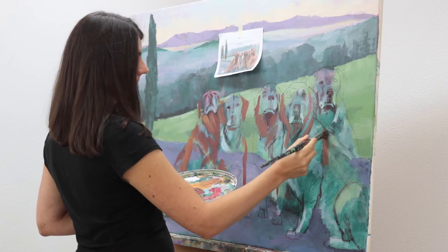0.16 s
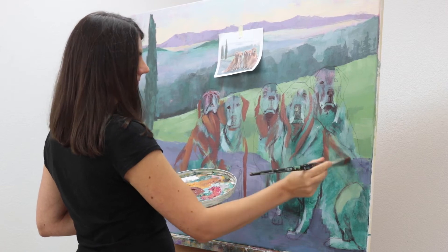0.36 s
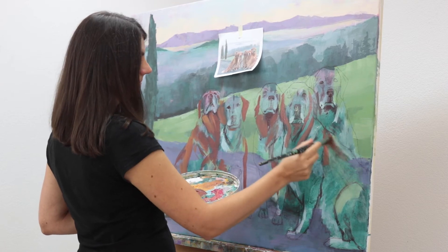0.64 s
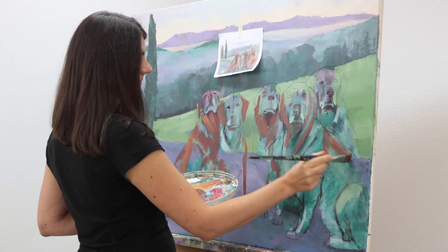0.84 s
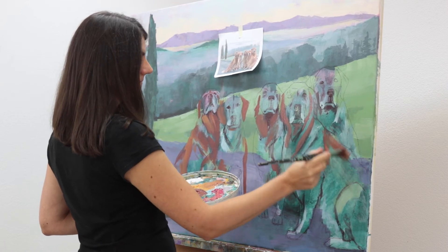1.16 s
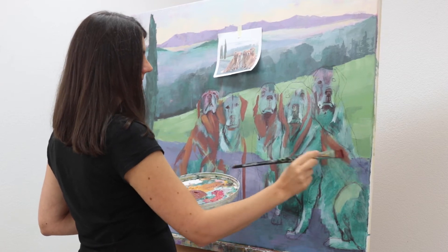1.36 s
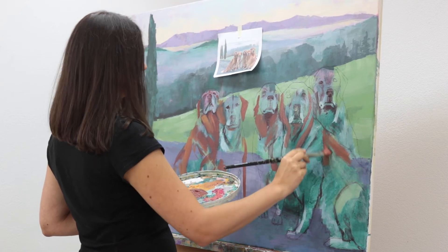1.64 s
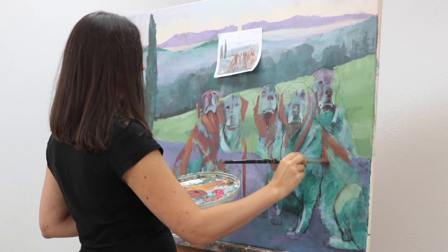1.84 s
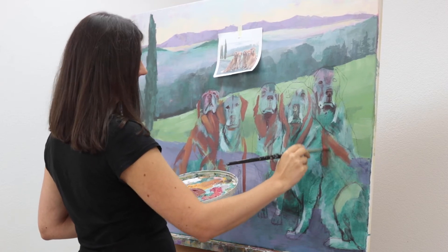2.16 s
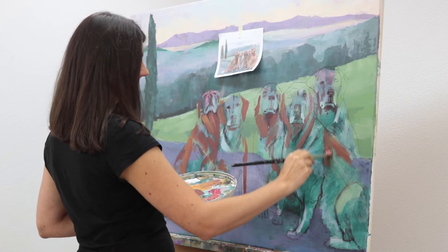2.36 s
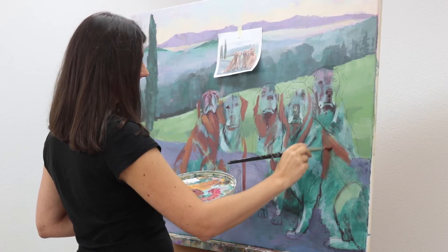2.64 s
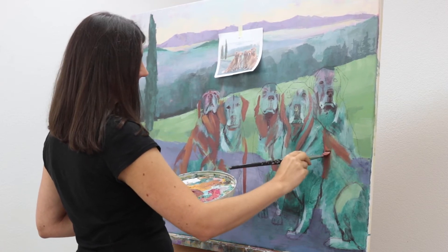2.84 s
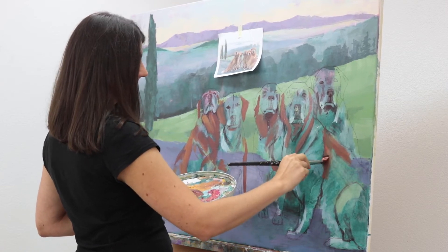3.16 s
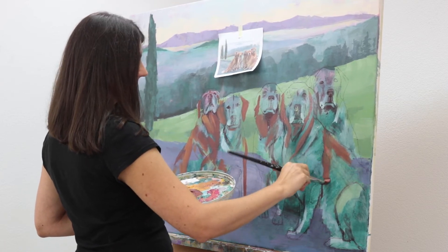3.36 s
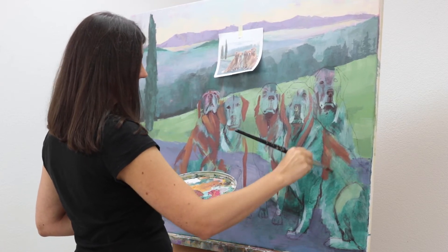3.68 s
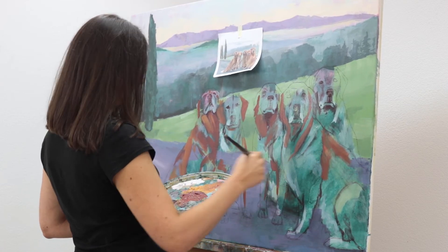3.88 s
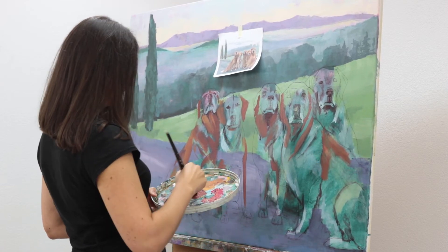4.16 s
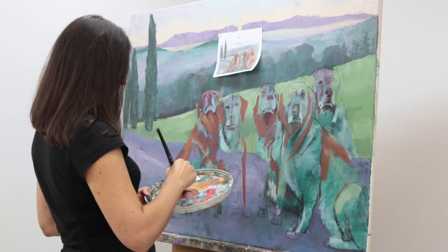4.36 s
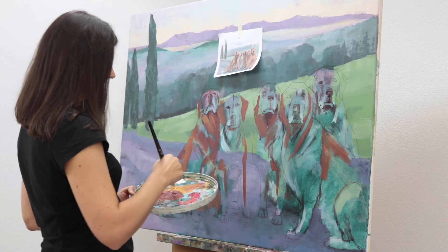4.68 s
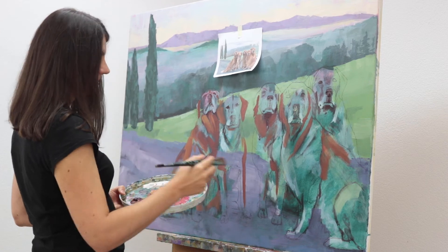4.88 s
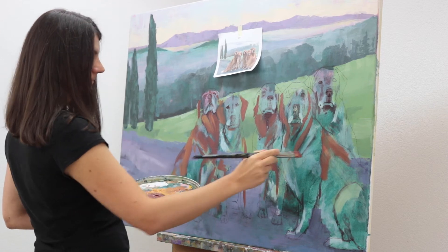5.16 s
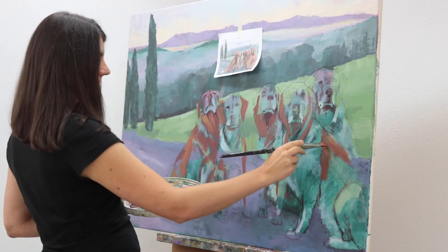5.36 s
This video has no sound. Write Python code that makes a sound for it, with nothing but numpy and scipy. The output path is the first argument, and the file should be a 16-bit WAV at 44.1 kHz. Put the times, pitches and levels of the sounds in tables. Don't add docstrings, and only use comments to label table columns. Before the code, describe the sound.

Short hissing bristle strokes with faint squeaks and hollow membrane thuds fill the first few seconds. The strokes stop, cloth rustles, and the brush raps a hand-held plate in two or three small clusters, with brief ringing, wet drags and tiny snaps. A quieter pause follows, then dull wooden ticks and soft final strokes. Quiet room, short reflections, gentle low rumble, microphone a few steps away.

```python
import sys
import numpy as np
from scipy import signal
from scipy.fft import rfft, irfft
from scipy.io import wavfile
from scipy.ndimage import uniform_filter1d

SR = 44100
rng = np.random.default_rng(int(sys.argv[2]) if len(sys.argv) > 2 else 0)


def pcm_store(signal):
    levels = np.round(np.clip(np.atleast_2d(signal), -1, 1) * 32767)
    wavfile.write(sys.argv[1], SR, levels.astype(np.int16).T)


def field_ratio(decibels):
    return 10 ** (np.asarray(decibels, dtype=float) / 20)


N = 243431

# start_s, length_s, level_db, share of length before the top
STROKES = [(0.0, 0.091, -61, 0.67), (0.113, 0.17, -51, 0.12), (0.218, 0.25, -49, 0.65),
           (.455, 0.05, -54.5, 0.23), (.544, 0.027, -54, 0.12), (0.591, 0.28, -51.5, 0.55),
           (.868, 0.06, -53.5, 0.75), (.893, 0.17, -48.5, 0.3), (1.044, 0.34, -50, 0.34),
           (1.292, 0.21, -51.5, 0.77), (1.502, 0.12, -52.5, 0.69), (1.634, 0.16, -52, 0.47),
           (1.795, 0.12, -56.5, 0.6), (1.965, 0.19, -59, 0.47), (2.13, 0.16, -51.5, 0.74),
           (2.28, 0.13, -51, 0.72), (2.36, 0.18, -51, 0.39), (2.521, 0.2, -51.5, 0.71),
           (2.722, 0.19, -59.5, 0.21), (2.912, 0.27, -64, 0.32), (3.13, 0.16, -62, 0.95),
           (3.25, 0.17, -51.5, 0.66), (3.41, 0.081, -63.5, 0.76), (3.463, .14, -50.5, 0.4),
           (3.62, 0.11, -48.5, .4), (5.096, 0.41, -59, 0.46), (5.4, 0.036, -54.5, .25),
           (5.438, 0.12, -55.5, .5)]
# freq_hz, density_db (per Hz)
BRISTLE_HISS = [(530, -3), (900, 5.5), (1390, -4), (1720, -2.5), (2330, 2.5), (3340, -3), (4860, -3.5),
                (5550, -6.5), (6250, -3.5), (7060, -7), (10800, -9), (15400, -16.5)]
# ring_hz, width_hz, level_db
BRISTLE_RINGS = [(1660, 38, 11.5), (5090, 150, 5.5), (6500, 500, -6)]
# time_s, bent_ring_hz, bent_ring_db, brightness_db (above 6 kHz)
GRIP = [(0.05, 4600, -4, 4), (.15, 4430, -4, -6), (.37, 4580, -25, 4.5), (.55, 4300, -6, -2),
        (.8, 4900, -10, 2), (1.0, 4700, -14, 3), (1.2, 4500, -25, 2), (1.55, 4200, -3, 1.5),
        (2.0, 3980, 9.5, 4), (2.2, 4380, -9, -1), (2.45, 4150, -2, 2), (2.62, 4200, -3, 1.5),
        (3.0, 4400, -11, 3), (3.36, 4150, -12, 0.5), (3.53, 4500, 8, 6), (3.67, 4370, -2, 0.5),
        (5.25, 4200, -34, -11), (5.5, 4400, -4, -17)]
# start_s, length_s, level_db, pitch_hz
SQUEALS = [
    (0.0, .078, -66, 6500),
    (0.127, 0.036, -64, 4280),
    (.55, .015, -71, 6700),
    (.9025, 0.0084, -46.5, 2400),
    (.91, 0.044, -64, 4700),
    (1.53, 0.09, -60, 4120),
    (1.665, 0.076, -66, 4100),
    (1.8, .09, -65, 5300),
]
# start_s, length_s, drum_db, share before the top, upper_over_low_db
PRESSES = [(0.127, 0.059, -51, 0.3, 13), (.175, .055, -52.5, .5, -1), (0.254, 0.16, -44.5, .2, -1),
           (0.456, 0.021, -51, 0.61, 3), (0.551, 0.02, -51, 0.22, -2), (0.627, 0.13, -51, 0.66, -3.5),
           (0.703, .15, -48.5, 0.24, -0.5), (0.905, 0.17, -55, 0.28, 1.5), (1, 0.056, -49, 0.81, 5.5),
           (1.054, 0.095, -57, 0.54, 0), (1.115, 0.1, -48.5, 0.63, -4), (1.176, 0.14, -51, 0.21, 3.5),
           (1.323, 0.17, -55, 0.82, 3.5), (1.516, 0.11, -62, 0.38, 8), (1.66, 0.19, -51, 0.13, 1),
           (1.971, 0.13, -58, 0.1, 2), (2.129, 0.13, -57.5, 0.5, 6.5), (2.235, 0.068, -55, .4, -10.5),
           (2.303, 0.14, -49, 0.51, -4), (2.39, 0.17, -46, 0.32, -4), (2.584, 0.16, -54.5, 0.56, 1),
           (2.715, 0.16, -59, 0.45, 9), (2.833, 0.26, -58, 0.56, -6), (3.077, 0.12, -65, 0.28, -3),
           (3.178, 0.24, -47.5, 0.79, -2.5), (3.483, 0.11, -45, .25, -2), (3.62, 0.11, -56, 0.38, 1),
           (5.07, 0.49, -73, 0.54, -8), (5.392, 0.11, -56.5, 0.3, -4.5), (5.47, 0.058, -49.5, 0.33, -1.5)]
# mode_hz, width_hz, level_db
CANVAS_LOW = [(184, 17, -9.5), (246.4, 49.5, 2), (355, 370, -5.5)]
# mode_hz, width_hz, level_db
CANVAS_UPPER = [(403, 44, -12.5), (534, 72, 3.5), (701, 110, -6), (770, 23, -8), (1020, 110, -21.5)]
# time_s, pitch_factor
TENSION = [(.15, 0.99), (.3, 0.93), (.7, .98), (.77, 1.17), (.84, 0.91), (1.17, 0.96), (1.22, 1.2),
           (1.4, 0.86), (1.7, 0.95), (2.0, 1.0), (2.26, 0.83), (2.36, 0.86), (2.43, 1.11), (2.5, .95),
           (2.62, 0.7), (3.28, 1.13), (3.34, .87), (3.52, 0.97)]
# freq_hz, density_db (per Hz)
AIR = [(90, -0.5), (250, -9), (600, -12), (1200, -16.5), (2300, -19), (4000, -26), (9500, -31.5),
       (15400, -31.5)]
# (over the usual, below 1.5 kHz)
DRIFT = [(0.0, -6), (.11, -2.5), (.3, -1), (1.8, 0), (2.8, 0), (3.8, -1), (4.3, 1.5), (4.75, -3.5),
         (5.0, -3), (5.2, 2)]
# low_hz, high_hz
CIRCUIT_BAND = (12750, 14300)
# pitch_hz, level_db
WHINES = [(10454, -88), (13690, -87), (14060, -86)]
# start_s, length_s, level_db, share before the top
RUMBLE = [(.15, 0.041, -49, 0.27), (.37, 0.15, -50, 0.5), (.6, 0.53, -52, 0.44), (1.15, 0.18, -61, 0.43),
          (1.38, 0.2, -49, 0.54), (1.6, 0.17, -41, 0.56), (1.76, 0.14, -44.5, 0.39),
          (2.25, 0.13, -49, 0.31), (2.45, 0.17, -41, 0.87), (2.72, 0.34, -46.5, 0.61),
          (3.06, 0.16, -55, 0.2), (3.45, 0.36, -41.5, 0.25), (3.85, 0.19, -46.5, 0.62),
          (4.08, 0.11, -57, 0.38), (4.3, 0.17, -61, 0.69), (4.44, 0.087, -48, 0.37),
          (5.15, 0.24, -49.5, 0.84), (5.4, 0.25, -39, 0.5)]
# freq_hz, density_db (per Hz)
RUMBLE_SHAPE = [(12, -17), (25, 14.5), (38, 10.5), (60, 0), (100, -6.5), (200, -38)]
# time_s, peak_db, rocking_hz
NUDGES = [
    (.16, -39, 60),
    (.39, -42, 71),
    (1.21, -44, 150),
    (1.659, -48, 202),
    (2.5, -44, 100),
    (2.79, -43, 55),
    (4.29, -45, 70),
    (4.881, -42, 63.6),
]
# time_s, peak_db, contact_ms
TICKS = [
    (0.182, -38, 0.33),
    (0.5465, -37, 0.34),
    (0.548, -38, .2),
    (0.5516, -43, 0.41),
    (0.555, -53, 0.42),
    (5.247, -34.5, 1),
    (5.409, -34, 0.96),
    (5.4998, -34.5, 0.73),
]
# mode_hz, level_db, t60_s
WOOD = [(354, -8.5, 0.023), (585, 3, 0.0024), (980, -20, 0.015), (2400, -24, .01), (4500, -18, .006)]
# time_s, peak_db, contact_ms, sway_db (whole canvas), tick_db, pitch_factor (spot)
TAPS = [
    (0.2506, -13.5, 1.32, -14, -20.5, 1.02),
    (0.278, -28.5, 0.88, -27, -25, 0.9),
    (0.9028, -27.5, 1.2, 0.5, -17, 1.15),
    (1.667, -51, 2.6, 20.5, -30, 0.39),
    (2.5718, -33.5, 3.6, 8.5, -30, 0.87),
    (3.4842, -18, 3.7, 1.5, -19.5, 0.913),
    (3.519, -37, 1.8, -17, -25, 0.9),
    (3.542, -35, 2.6, 0, -30, 1.05),
    (3.643, -38.5, 9.8, 15, -30, 0.7),
]
# mode_hz, level_db, t60_s
TAP_RING = [(234.6, 9.5, 0.049), (179, 11.5, 0.0041), (521, 6, 0.023), (913, -2.5, 0.064), (1950, -40, .02)]
# freq_hz, density_db (per Hz)
TIP_TICK = [(900, -10), (2500, -6), (4000, -8), (6500, -6), (8500, -11), (11000, -11), (13000, -10),
            (16000, -14)]
# start_s, length_s, level_db, share before the top
RUSTLE = [
    (3.72, 0.22, -62.5, 0.44),
    (3.86, 0.2, -72, 0.5),
    (4.05, 0.11, -60.5, 0.47),
    (4.64, 0.37, -60.5, 0.67),
    (4.98, 0.19, -64, 0.61),
]
# start_s, length_s, level_db, share before the top
DABS = [
    (4.165, 0.024, -44, 0.77),
    (4.187, 0.016, -48, .4),
    (4.2, 0.059, -49, 0.32),
    (4.235, 0.083, -54.5, 0.21),
    (4.303, 0.036, -57.5, .4),
    (4.382, 0.042, -46.5, 0.53),
    (4.425, 0.06, -54.5, 0.62),
    (4.476, 0.025, -56, 0.78),
    (4.553, 0.037, -47.5, 0.15),
    (4.58, 0.079, -56.5, .5),
]
# freq_hz, density_db (per Hz)
PAINT = [(700, -11), (1400, 0.5), (1950, -1), (2930, -6), (3470, -9), (4800, -8.5), (10600, -8),
         (15400, -20)]
# mode_hz, width_hz, level_db
PLATE_HUM = [(242, 120, -17), (499, 23, -7), (630, 130, -11), (790, 71, -5.5)]
# time_s, peak_db, contact_ms, shove_db (hand), clink_db (ferrule)
KNOCKS = [(4.1662, -32, 1.54, -3, -16), (4.1725, -31, 1.76, -18, -6), (4.1768, -35, 1.4, -18, 3),
          (4.1812, -23, 1.64, -23, -10), (4.186, -30.5, 0.54, -22, -14), (4.276, -55, 1, -13, -21),
          (4.386, -38, 0.17, -4, 0.5), (4.389, -33.5, 2.04, -29, -23), (4.409, -46, 1.05, 10, 3),
          (4.4648, -43, 0.78, -17, -3), (4.5548, -33, 1.7, 3, -30), (4.5564, -15.5, 1.98, -25, -19)]
# mode_hz, level_db, t60_s
PLATE = [(518, 10.5, 0.043), (490, -20, 1.2), (478, -25, .6), (550, -1, 0.036), (630, -12, 0.27),
         (674, 3.5, 0.037), (763, 8, 0.073), (739, -13, 0.43), (810, -24, 0.046), (358, -8.5, 0.06),
         (194, -4.5, 0.078), (145, -3.5, 0.03), (100, 3, 0.051)]
# mode_hz, level_db, t60_s
CLINK = [(1300, -12, .03), (1900, -2, .035), (2100, -1, .035), (3600, 0, .035), (5150, -3, .028)]
# time_s, peak_db, burst_ms, film_hz
SNAPS = [(4.19, -40, 1.6, 9000), (4.2445, -38, 3.6, 10400), (4.2478, -31, 0.87, 10400),
         (4.2502, -31, 3.3, 10000), (4.2685, -36, 2.6, 8000), (4.276, -33.5, 2, 7500),
         (4.4102, -42, 1.2, 7840), (4.4395, -37, 1.2, 8500), (4.4647, -32, 2, 9200),
         (4.566, -30.5, 1.5, 6500), (4.577, -29.5, 0.6, 11000), (4.648, -35, 0.86, 7500),
         (5.472, -41, 1.5, 8940), (4.4895, -39, 1.5, 8700), (4.219, -37, 2.2, 8500),
         (4.227, -40, 1.5, 7500), (4.3145, -37.5, 3.4, 7450)]
# freq_hz, density_db (per Hz)
SNAP_SHAPE = [(1500, -12), (4000, -3), (7000, -2.5), (10500, -2.5), (13000, -5), (16000, 0.5)]
# freq_hz, t60_s
STUDIO = [(150, 0.76), (500, 0.62), (2000, 0.68), (8000, 0.29)]


def evened(x):
    return x / np.sqrt(np.mean(x ** 2) + 1e-20)


def noise():
    return rng.standard_normal(N)


def over_time(points):
    time_s, *columns = np.transpose(points)
    return [np.interp(np.arange(N) / SR, time_s, column) for column in columns]


def read(points, hz):
    f, value = np.transpose(points)
    return np.interp(np.log(hz + 1), np.log(f + 1), value)


def add(mix, s, sound):
    part = mix[round(s * SR):][:len(sound)]
    part += sound[:len(part)]


def coloured(x, points):
    gain = field_ratio(read(points, np.fft.rfftfreq(len(x), 1 / SR)))
    return evened(irfft(rfft(x) * gain, len(x)))


def patchy(x, patchy_db, frames, bins):
    z = signal.stft(x, nperseg=512)[2]
    patches = uniform_filter1d(rng.standard_normal(z.shape), int(bins), 0)
    patches = evened(uniform_filter1d(patches, int(frames), 1))
    return evened(signal.istft(z * field_ratio(patchy_db * patches), nperseg=512)[1][:N])


def resonate(x, hz, width):
    turn = np.exp(2j * np.pi * np.cumsum(hz * np.ones(len(x))) / SR)
    r = np.exp(-np.pi * width / SR)
    return 2 * (turn * signal.lfilter([1 - r], [1, -r], x / turn)).real


def arches(rows, sharp):
    power = np.zeros(N)
    for start, length, db, share in rows:
        top = np.clip(share, .03, .97) * length
        u = np.interp(np.arange(0, length, 1 / SR), [0, top, length], [0, 1, 0])
        add(power, max(start, 0), (field_ratio(db) * np.sin(np.pi / 2 * u) ** sharp) ** 2)
    return np.sqrt(power)


def slips(per_s, spread_db, flicker_db, flicker_ms):
    size = field_ratio(spread_db * np.minimum(rng.exponential(1, N), 5)) * rng.choice([-1., 1.], N)
    clumps = evened(uniform_filter1d(noise(), int(flicker_ms * SR / 1000)))
    happens = rng.random(N) < per_s / SR
    return evened(size * happens * field_ratio(flicker_db * clumps))


def drum(shake, modes, pitch=1):
    skin = np.zeros(N)
    for k, (hz, width, db) in enumerate(modes):
        skin += (-1) ** k * field_ratio(db) * evened(resonate(shake, pitch * hz, width))
    return evened(signal.sosfilt(signal.butter(2, 140, "high", fs=SR, output="sos"), skin))


def struck(modes, contact_ms, pitch=1):
    t = np.arange(SR // 2) / SR
    ring = sum(field_ratio(db - 60 * t / t60) * np.cos(2 * np.pi * pitch * hz * t) for hz, db, t60 in modes)
    u = t[:400] * 1000 / contact_ms
    push = np.sin(np.pi * np.minimum(u / 1.246, 1)) ** 4
    ring = signal.fftconvolve(ring, push)[:len(t)]
    return ring / abs(ring).max()


def sway(hz, t60, lead, rise_s):
    t = np.arange(SR // 2) / SR
    return -field_ratio(-60 * t / t60) * np.sin(2 * np.pi * hz * t + lead) * np.minimum(t / rise_s, 1)


def burst(ms, points):
    i = np.arange(1024)
    puff = coloured(rng.standard_normal(1024), points)
    puff = puff * np.exp(-i * 1000 / SR / ms) * np.minimum(i / 14, 1)
    return puff / abs(puff).max()


def bristles():
    ring_hz, ring_db, bright_db = over_time(GRIP)
    tips = coloured(slips(per_s=14000, spread_db=2.5, flicker_db=0.73, flicker_ms=7.7), BRISTLE_HISS)
    tips = patchy(tips, patchy_db=1.8, frames=14, bins=7)
    rings = 0.3 * sum(field_ratio(db) * resonate(tips, hz, width) for hz, width, db in BRISTLE_RINGS)
    bent = field_ratio(ring_db) * (resonate(tips, ring_hz, 390) + 0.59 * resonate(tips, 1.9 * ring_hz, 520))
    low = signal.sosfilt(signal.butter(2, 6000, fs=SR, output="sos"), tips)
    hiss = arches(STROKES, sharp=0.95) * (low + field_ratio(bright_db) * (tips - low) + rings + bent)
    for start, length, db, hz in SQUEALS:
        piece = tips[round(start * SR):][:round(length * SR)]
        song = evened(resonate(piece, hz, width=hz * 0.029))
        add(hiss, start, field_ratio(db) * np.sqrt(np.hanning(len(piece))) * song)
    return hiss


def canvas():
    shake = slips(per_s=1500, spread_db=1.5, flicker_db=1.5, flicker_ms=28)
    low_rows = [(s, length, db - upper_db / 2, share) for s, length, db, share, upper_db in PRESSES]
    upper_rows = [(s, length, db + upper_db / 2, share) for s, length, db, share, upper_db in PRESSES]
    tension, = over_time(TENSION)
    low = arches(low_rows, sharp=1.33) * drum(shake, CANVAS_LOW, tension)
    return low + arches(upper_rows, sharp=1.33) * drum(shake, CANVAS_UPPER)


def room_tone():
    drift = field_ratio(over_time(DRIFT)[0])
    air = field_ratio(-53.5) * patchy(coloured(noise(), AIR), patchy_db=2.47, frames=68, bins=8.3)
    low = signal.sosfiltfilt(signal.butter(1, 1500, fs=SR, output="sos"), air)
    rumble_level = np.hypot(field_ratio(-54) * drift, arches(RUMBLE, sharp=1.23))
    return air + (drift - 1) * low + rumble_level * coloured(noise(), RUMBLE_SHAPE)


def electronics():
    band = signal.sosfilt(signal.butter(4, CIRCUIT_BAND, "band", fs=SR, output="sos"), noise())
    level_db = -78 + 2 * np.arange(N) / SR
    circuit = field_ratio(level_db) * patchy(band, patchy_db=-3.5, frames=40, bins=5.5)
    whines = sum(field_ratio(db) * evened(resonate(noise(), hz, 11.0)) for hz, db in WHINES)
    return circuit + whines


def easel():
    out = np.zeros(N)
    for s, db, hz in NUDGES:
        add(out, s, field_ratio(db) * sway(hz, t60=0.103, lead=0, rise_s=0.01))
    for s, db, contact_ms in TICKS:
        add(out, s, -field_ratio(db) * struck(WOOD, contact_ms))
    return out


def taps():
    out = np.zeros(N)
    for s, db, contact_ms, sway_db, tick_db, pitch in TAPS:
        add(out, s, field_ratio(db) * struck(TAP_RING, contact_ms, pitch))
        add(out, s, field_ratio(db + sway_db) * sway(46, t60=0.066, lead=0.66, rise_s=0.0052))
        add(out, s, field_ratio(db + tick_db) * burst(3.1, TIP_TICK))
    return out


def sleeve():
    return arches(RUSTLE, sharp=0.64) * coloured(noise(), BRISTLE_HISS)


def dabs():
    drag = coloured(slips(per_s=12000, spread_db=2.5, flicker_db=1.5, flicker_ms=4), PAINT)
    hum = drum(noise(), PLATE_HUM)
    return field_ratio(0.5) * arches(DABS, sharp=0.53) * drag + field_ratio(-6.0) * arches(DABS, sharp=0.35) * hum


def knocks():
    out = np.zeros(N)
    for s, db, contact_ms, shove_db, clink_db in KNOCKS:
        add(out, s, -field_ratio(db) * struck(PLATE, contact_ms))
        add(out, s, field_ratio(db + shove_db) * sway(41, t60=0.14, lead=2.0, rise_s=0.0038))
        add(out, s, field_ratio(db + clink_db) * struck(CLINK, 0.21, rng.uniform(0.94, 1.03)))
    return out


def snaps():
    out = np.zeros(N)
    for s, db, ms, hz in SNAPS:
        puff = burst(ms, SNAP_SHAPE)
        add(out, s, field_ratio(db) * (0.69 * puff + 1.18 * resonate(puff, hz, 1400)))
    return out


def studio(x):
    echoes = np.zeros(SR // 2)
    at = np.arange(300, SR // 2 - 20, 20)
    echoes[at + rng.integers(0, 20, len(at))] = rng.choice([-1., 1.], len(at))
    hz, t, z = signal.stft(echoes, SR, nperseg=256)
    decay = field_ratio(-60 * t / read(STUDIO, hz)[:, None])
    tail = signal.istft(z * decay, SR, nperseg=256)[1]
    return signal.fftconvolve(x, tail / np.linalg.norm(tail))[:N]


def scene():
    rubbing = bristles() + canvas()
    hits = easel() + taps() + dabs() + knocks() + snaps()
    reflections = studio(field_ratio(-16.5) * hits + field_ratio(-12.5) * rubbing)
    background = room_tone() + electronics() + sleeve()
    return (hits + rubbing + reflections + background)[None]


def low_pass(x):
    return signal.sosfilt(signal.butter(12, 16240, fs=SR, output="sos"), x)


def record(dry):
    band_limit = signal.firwin(1501, 15770, window=("kaiser", 9), fs=SR)
    limited = signal.oaconvolve(dry, band_limit[None], "same")
    return low_pass(limited)


dry = scene()
out = record(dry)
pcm_store(out)
```